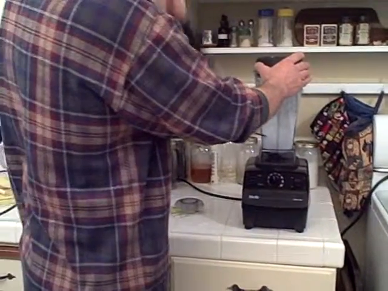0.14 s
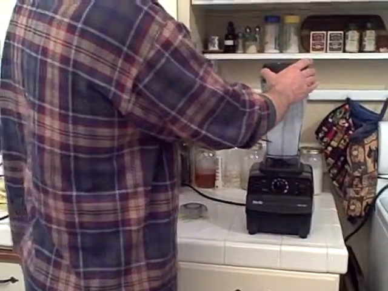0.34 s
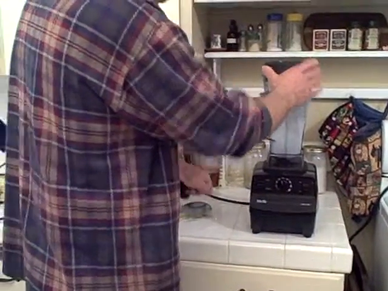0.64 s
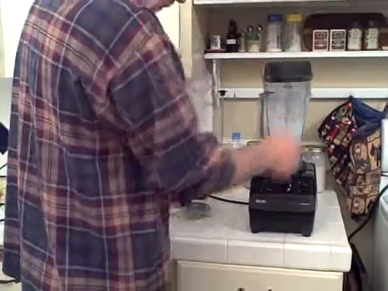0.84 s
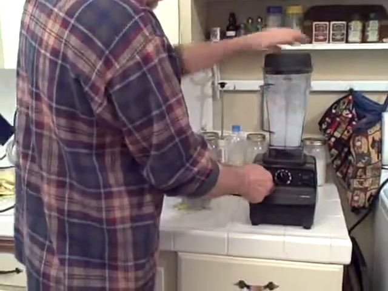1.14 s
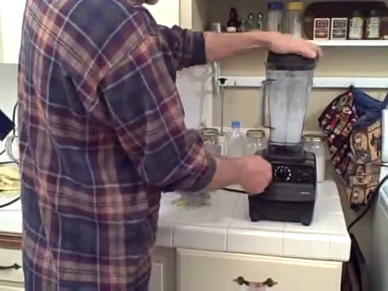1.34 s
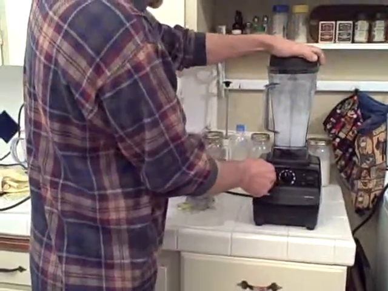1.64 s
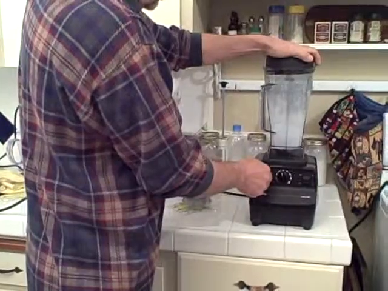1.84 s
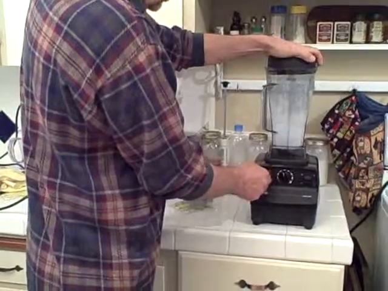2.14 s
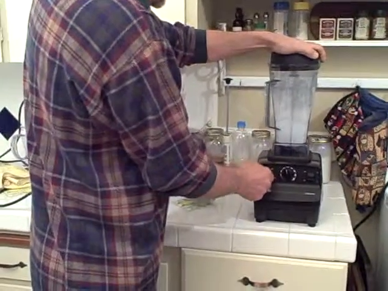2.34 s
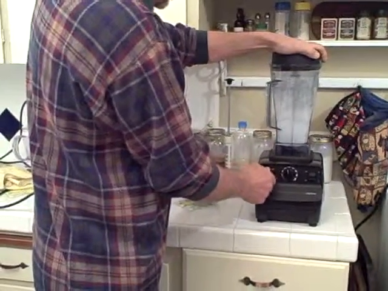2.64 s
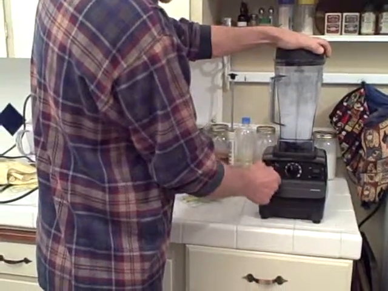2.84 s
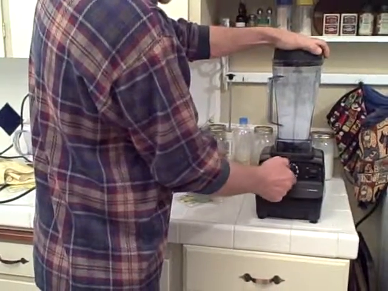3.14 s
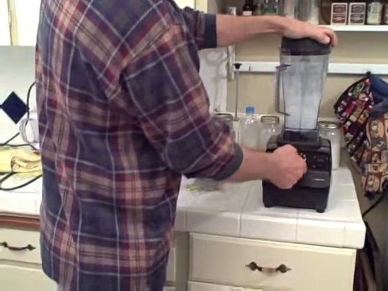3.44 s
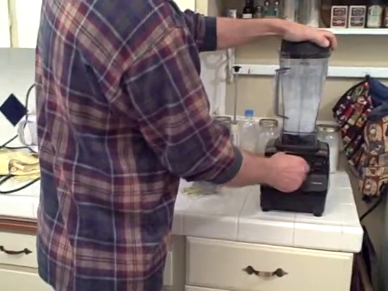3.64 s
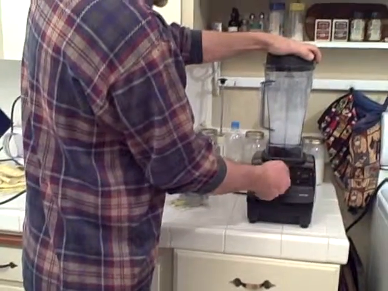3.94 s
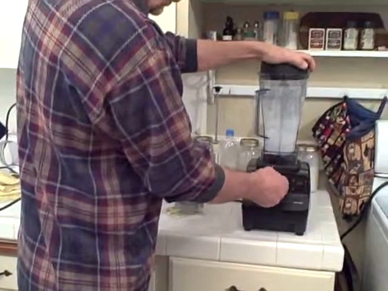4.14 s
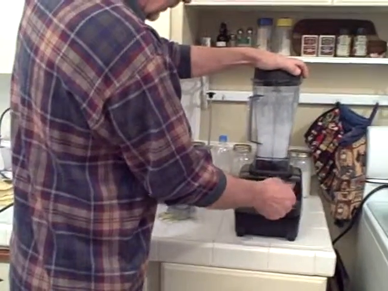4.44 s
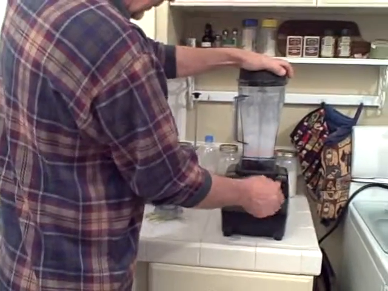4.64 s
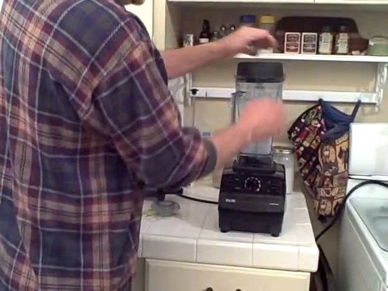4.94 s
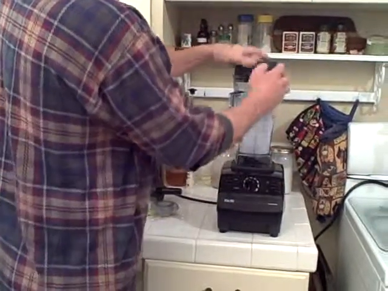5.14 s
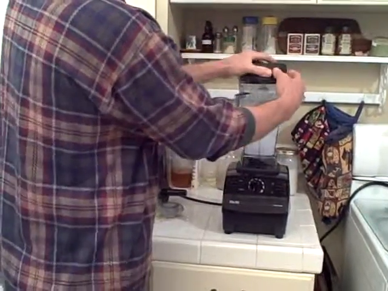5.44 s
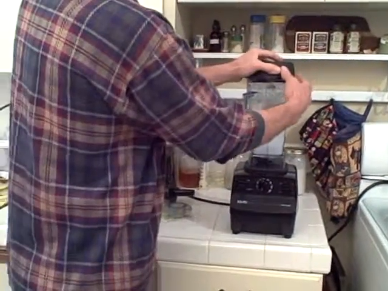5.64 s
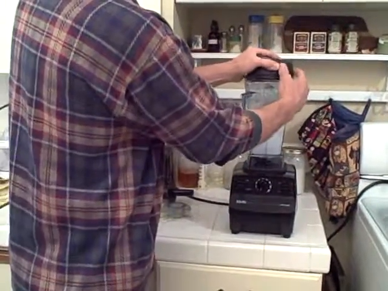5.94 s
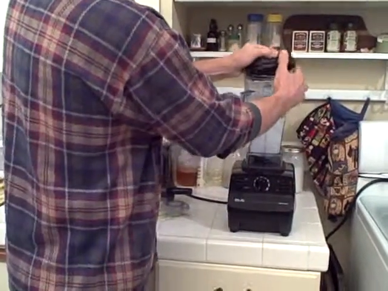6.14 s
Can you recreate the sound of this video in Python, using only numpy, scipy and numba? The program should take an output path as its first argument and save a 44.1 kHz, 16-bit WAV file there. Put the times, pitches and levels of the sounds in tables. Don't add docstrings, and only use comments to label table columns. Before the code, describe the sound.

Dial knock, blender roaring up to full speed with ice cracking on the jug, whine sliding down to a low buzz, loud switch click, quiet lid handling.

```python
import sys
import numpy as np
from scipy import signal
from scipy.fft import rfft, irfft
from scipy.io import wavfile
from scipy.ndimage import uniform_filter1d
from numba import njit

SR = 44100
rng = np.random.default_rng(int(sys.argv[2]) if len(sys.argv) > 2 else 0)


def wrap_up_sound(samples):
    columns = np.atleast_2d(samples).T
    tamed = np.clip(columns, -1, 1)
    steps = np.round(tamed * 32767).astype(np.int16)
    wavfile.write(sys.argv[1], SR, steps)


def gain_from_db(level_db):
    decades = np.asarray(level_db, float) / 20
    return 10 ** decades


N = 277824
T = np.arange(N) / SR
HZ = np.maximum(np.fft.rfftfreq(N, 1 / SR), 1)
SWITCH_OFF_S = 4.49


def noise():
    return rng.standard_normal(N)


def level(x, db):
    return x * gain_from_db(db) / np.sqrt(np.mean(x ** 2))


def colour(x, table):
    hz, db = np.transpose(table)
    return irfft(rfft(x) * gain_from_db(np.interp(np.log(HZ), np.log(hz), db)), N)


def band(x, lo_hz, hi_hz):
    return signal.sosfilt(signal.butter(3, [lo_hz, hi_hz], "band", fs=SR, output="sos"), x)


def walk(rate_hz):
    k = int(SR / rate_hz)
    steps = np.repeat(rng.standard_normal(N // k + 1), k)
    return 1.375 * uniform_filter1d(uniform_filter1d(steps, k), k)[:N]


def fade(t0, t60):
    return (T >= t0) * gain_from_db(-60 * np.maximum(T - t0, 0) / t60)


def sine_from(t0, hz):
    return np.sin(2 * np.pi * hz * (T - t0))


def resonant(modes):
    gain = sum(gain_from_db(d) / np.sqrt(w) / (1 + ((HZ - f) / w * 2) ** 2) for f, w, d in modes)
    return level(irfft(rfft(noise()) * gain, N), 0)


def room(x):
    t60_s, tail_db = 0.35, 11
    tail = (noise() * fade(0.0003, t60_s))[:SR]
    tail *= gain_from_db(tail_db) / np.sqrt(np.sum(tail ** 2))
    return 1.15 * x + signal.fftconvolve(x, tail)[:N]


# f/Hz, level/dB
MICROPHONE_PEAK = [(900, -32), (2500, -33), (3500, -13.5), (5000, -7.5), (6300, 2.5), (7500, -7.5),
                   (8500, -24), (9500, -33)]


def microphone(x):
    return colour(x, MICROPHONE_PEAK)


# t/s, level/dB
EFFORT = [(0.0, -20), (0.12, -23), (0.32, -21.5), (0.78, -21.5), (1.3, -22), (1.42, -17), (1.62, -14.5),
          (1.85, -13.5), (2.06, -15), (2.32, -15), (2.5, -15), (2.8, -13.5), (3.0, -15), (3.31, -25.5),
          (3.48, -35), (3.68, -43), (4.49, -41.5)]
# t/s, level/dB
BITES = [(1.39, 3), (1.73, 1.5), (2.17, 2), (2.42, 2.5), (2.72, 1), (2.892, 3.5)]


def effort():
    bite_s = 0.026
    s, db = np.transpose(EFFORT)
    return np.interp(T, s, db) + 20 + sum(d * np.exp(-((T - t) / bite_s) ** 2) for t, d in BITES)


# f/Hz, level/dB
ROOM_HISS = [(59, -52.5), (100, -26), (141, -6.5), (226, -7.5), (258, -10.5), (336, -5.5), (406, -15),
             (627, -13.5), (757, -18.5), (817, -15), (1390, -29), (7610, -23), (9200, -54), (12000, -82.5),
             (20200, -120)]
# f/Hz, level/dB
HUM = [(646, -63.5), (71, -57.5), (142, -72.5)]


def kitchen():
    rest = gain_from_db(-56.5)
    motor = (T < SWITCH_OFF_S) * gain_from_db(-51.5 + 0.5 * effort())
    handled = gain_from_db(-46.5) * fade(6.03, 3.8)
    rumble = (rest + motor + handled) * gain_from_db(2.5 * walk(8)) * level(band(noise(), 15, 94), 0)
    hum = sum(gain_from_db(d + 2.3 * walk(2.2)) * np.sin(2 * np.pi * f * T) for f, d in HUM)
    return rumble + hum + level(colour(noise(), ROOM_HISS), -56.5)


# t/s, f/Hz, level/dB, t60/s
TOUCHED = [(5.495, 3526, -58, 0.7), (5.495, 5179, -54.5, .9), (5.498, 6239, -56, .5),
           (5.498, 5770, -58, .4), (6.06, 1477, -60, 1.5)]
# t/s, f/Hz, level/dB, t60/s
THUMPS = [(4.49, 795, -33.5, 0.27), (4.49, 725, -33, 0.3), (4.489, 287, -33.5, 0.27),
          (4.809, 925, -51, 0.37), (5.359, 151, -54, .9), (5.719, 79, -46, 1.7), (6.03, 69.44, -48, 0.17),
          (4.9, 50, -46, 0.44), (6.243, 62, -32, .2), (6.045, 80, -39, .3), (6.1, 66, -35, .3),
          (5.92, 231, -47, 0.28)]
# t/s, f/Hz, level/dB, t60/s
CATCHES = [(1.3, 283, -26, .8), (1.385, 290, -27, .12), (1.43, 270, -25, .25), (1.33, 1700, -29, .25),
           (1.372, 1700, -23, .2), (1.39, 720, -27, .15), (1.425, 2650, -26, .3)]


def rings():
    out = np.zeros(N)
    for t, hz, db, t60 in TOUCHED + THUMPS + CATCHES:
        out += gain_from_db(db) * (fade(t, t60) - fade(t, t60 / 12)) * sine_from(t, hz)
    return out


# t/s, length/s, level/dB, centre f/Hz
RUBS = [(4.754, 0.059, -56, 4900), (4.94, 0.081, -73, 6000), (5.145, 0.1, -67.5, 5500),
        (5.488, 0.083, -66, 6000), (5.792, 0.051, -59.5, 4530), (6.026, 0.099, -64, 6000),
        (6.194, 0.04, -67, 6000)]


def hands():
    out = np.zeros(N)
    for t, length, db, hz in RUBS:
        swell = np.sin(np.pi * np.clip((T - t) / length, 0, 1))
        rub = level(microphone(noise()), 0) + level(band(noise(), 0.2 * hz, 1.15 * hz), -5.5)
        out += swell * gain_from_db(db + 2.5 * walk(60)) * rub
    return out


# t/s, peak level/dB
SEAL_SLIPS = [(5.7343, -54), (5.774, -46.5), (5.7826, -47), (5.7905, -45), (5.798, -43.5), (5.8056, -37.5),
              (5.814, -42), (5.8215, -41), (5.829, -46)]


def creak():
    push = np.zeros(N)
    for t, db in SEAL_SLIPS:
        push[int(t * SR)] = gain_from_db(db + 17)
    clicks = band(microphone(push), 1800, 9500) + gain_from_db(-1.5) * band(push, 2600, 4800)
    return clicks + gain_from_db(-7) * room(clicks)


# t/s, peak level/dB, jug wall (1-3.5 kHz) re peak/dB, base (under 1 kHz) re peak/dB, wall f/Hz
KNOCKS = [
    (0.8743, -3.5, -6, -18, 2860),
    (4.49, -1.5, -20.5, -18, 2820),
    (4.778, -27.5, -10.5, -6, 2320),
    (4.808, -13.5, -18, -25, 3470),
    (5.912, -21.5, -10.5, -16.5, 1690),
    (6.0268, -15, -16, -16, 1740),
    (6.081, -20, -26, -18, 2890),
]


def knocks():
    peak, jug, base, wall = np.zeros((4, N))
    for t, db, wall_db, base_db, hz in KNOCKS:
        i = int(t * SR)
        peak[i] = gain_from_db(db + 13)
        jug[i] = gain_from_db(db + wall_db + 20)
        base[i] = gain_from_db(db + base_db + 19)
        wall += gain_from_db(db + wall_db - 6.5) * fade(t, 0.012) * sine_from(t, hz)
    return band(microphone(peak), 1500, 9500) + band(jug, 1280, 4460) + band(base, 220, 1100) + wall


# t/s, overload splash level/dB
CHIPS = [(1.3941, -14), (1.601, -42.5), (1.6228, -43.5), (1.638, -28), (1.6655, -38.5), (1.7, -30),
         (1.7443, -27), (1.823, -39.5), (1.8604, -43.5), (1.897, -44), (2.1716, -36), (2.2055, -45),
         (2.24, -52), (2.2579, -35), (2.4143, -18), (2.6229, -46), (2.668, -58), (2.6822, -37.5),
         (2.7345, -50), (2.8025, -52.5), (2.8387, -37.5), (2.8837, -28)]


def chips():
    return sum((.95 + gain_from_db(d + 14)) * fade(t, .004) * sine_from(t, 6300) for t, d in CHIPS)


# t/s, level/dB
CRAWL_CREEPS = [(3.2, -30), (3.4, -7), (3.66, -9), (3.74, 0)]
# f/Hz, width/Hz, level/dB
CRAWL_MODES = [(212.6, 25, -10.5), (300, 40, -12.5), (373, 56, -9), (466, 28, -4.5), (750, 30, -7),
               (786, 24, -2.5), (840, 39, -11.5), (903, 25, -4), (1280, 20, -20), (2700, 30, -16)]


def crawl_buzz():
    creep = gain_from_db(np.interp(T, *np.transpose(CRAWL_CREEPS), left=-90))
    return creep * gain_from_db(-46.5 + 1.1 * walk(9.5)) * resonant(CRAWL_MODES)


def follow(layer):
    db, slope, flicker_db, rate_hz, settle_db = layer
    settling = np.interp(T, [3.55, 3.85], [0, settle_db])
    return gain_from_db(db + slope * effort() + flicker_db * walk(rate_hz) + settling)


@njit
def each_turn(x, lag, keep):
    y = x.copy()
    for i in range(1000, len(x)):
        k = int(lag[i])
        a = lag[i] - k
        returned = (1 - a) * y[i - k] + a * y[i - k - 1]
        y[i] = np.sqrt(1 - keep[i] ** 2) * x[i] + keep[i] * returned
    return y


# f/Hz, level/dB
RUSH_COLOUR = [(59, -54), (100, -15), (173, -15.5), (221, -9), (509, -21.5), (864, -13), (1260, -19.5),
               (1470, -12.5), (1950, -17), (2230, -15), (3190, -18.5), (6180, 6.5), (7610, -2.5),
               (8530, -19.5), (9200, -26.5), (12000, -75.5), (20200, -120)]
# level at -20 dB effort/dB, slope/(dB per dB effort), flicker/dB, flicker rate/Hz, settling/dB
LAYERS = [
    (-19.5, 1.0, 0.28, 25, -0.8),
    (-26, 0.88, 1.28, 15, -8),
    (-37.5, 1.53, 1.4, 14, 13),
    (-41, 0.83, 4, 14, -3),
]
HOUSING_RING = (-37, .87, 1.5, 14, -5)
# f/Hz, width/Hz, level/dB
HOUSING = [(244, 23, -2), (344, 30, -20.5), (484, 140, -1.5), (769, 180, -4.5), (893, 26, -7),
           (1472, 240, -11), (1732, 50, -9), (1927, 84, -4), (2760, 170, -4)]


def rush(speed, fast):
    flow = colour(each_turn(noise(), SR / speed, 0.21 * fast), RUSH_COLOUR)
    edges_hz = [(3900, 9500), (1080, 3900), (350, 1080), (105, 350)]
    surge = gain_from_db(0.31 * walk(6.26))
    out = follow(HOUSING_RING) * resonant(HOUSING)
    for (lo, hi), layer in zip(edges_hz, LAYERS):
        out += surge * follow(layer) * level(band(flow, lo, hi), 0)
    return out


# multiple of the shaft rate, level re full unbalance tone/dB
WHINE = [(5, -19), (6, -17), (8, -28.5), (10, -26.5), (11, -24.5), (12, -18.5), (13, -14), (14, -14.5),
         (15, -16), (16, -14), (17, -12.5), (18, -13), (19, -16.5), (21, -14), (22, -7), (23, -8.5)]


def whine(turn, fast):
    return fast * sum(gain_from_db(-18.5 + d + 4.55 * walk(11)) * np.sin(k * turn + k * k) for k, d in WHINE)


# t/s, rotation f/Hz, unbalance level/dB
SHAFT = [(1.48, 234.2, -45), (1.51, 240.6, -42), (1.55, 244, -22), (1.65, 273.7, -18.5),
         (1.724, 285.3, -25.5), (1.78, 286.8, -16.5), (2.049, 283.1, -23.5), (2.17, 289.3, -18.5),
         (2.27, 294.1, -20.5), (2.449, 282.7, -17.5), (2.68, 305.2, -23.5), (2.79, 310.6, -39.5),
         (2.87, 309, -44.5), (2.93, 300, -21.5), (3.013, 253.5, -13.5), (3.1, 213.3, -27.5),
         (3.22, 140.2, -41), (3.4, 88, -65)]
# t/s, depth/dB
NULLS = [(1.608, -5), (1.72, -2.5), (2.496, -7.5), (2.992, -14), (3.044, -6), (3.104, -6), (3.17, -16)]


def blender():
    s, hz, db = np.transpose(SHAFT)
    speed = np.interp(T, s, hz) * (1 + 0.0022 * walk(25))
    turn = 2 * np.pi * np.cumsum(speed) / SR
    fast = np.clip((speed - 200) / 80, 0, 1) * np.interp(T, [1.5, 1.7, 2.75, 3.0], [0.29, 0.92, 0.72, 0.14])

    null_s, base_hz, base_width_hz = 0.014, 278.4, 22
    nulls = sum(d * np.exp(-((T - t) / null_s) ** 2) for t, d in NULLS)
    tone_db = np.interp(T, s, db, left=-90, right=-90) + nulls + 2.4 * walk(16)
    tone = gain_from_db(tone_db) * np.sin(turn)
    crossing = np.exp(-((2 * speed - base_hz) / base_width_hz) ** 2)
    second = gain_from_db(-35.5 + 3 * walk(16)) * crossing * np.sin(2 * turn)
    tones = np.sqrt(2) * (tone + second + whine(turn, fast))

    running = np.where(T < SWITCH_OFF_S, 1, fade(SWITCH_OFF_S, .4))
    return tones + running * (rush(speed, fast) + crawl_buzz()) + chips()


def scene():
    return (kitchen() + rings() + room(hands() + knocks()) + creak() + blender())[None]


def band_limit(x):
    return signal.sosfilt(signal.butter(12, 16030, fs=SR, output="sos"), x)


def record(dry):
    top_hz, ceiling = 8590, .73
    low_pass = signal.ellip(8, .2, 80, top_hz, fs=SR, output="sos")
    mix = np.clip(signal.sosfilt(low_pass, np.tanh(dry)), -ceiling, ceiling)
    return band_limit(mix)


dry = scene()
out = record(dry)
wrap_up_sound(out)
```